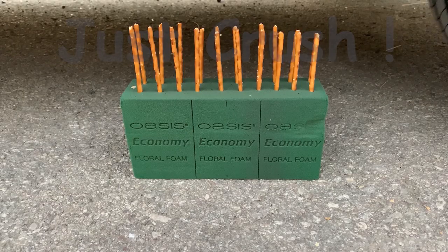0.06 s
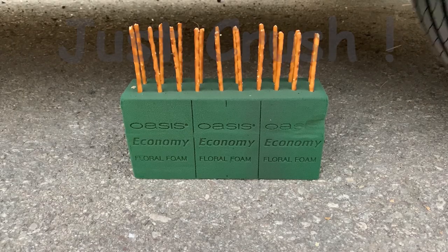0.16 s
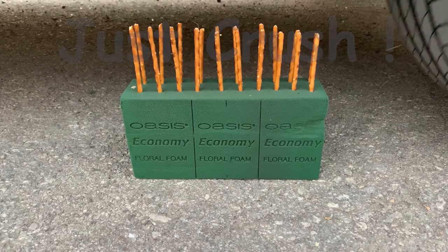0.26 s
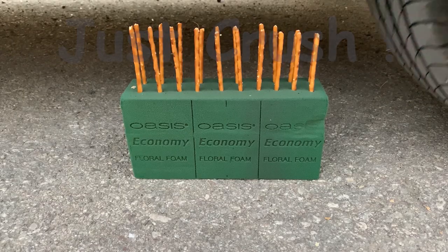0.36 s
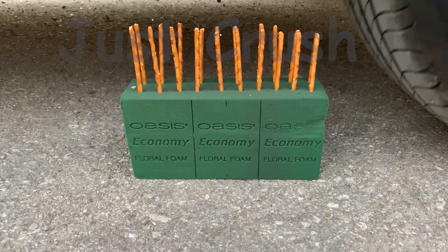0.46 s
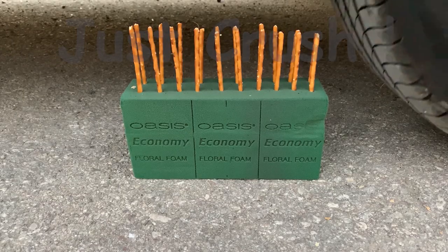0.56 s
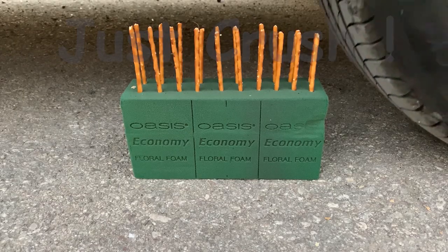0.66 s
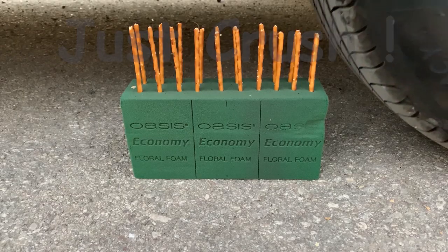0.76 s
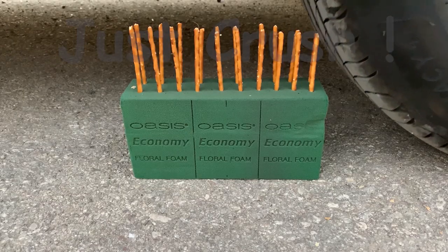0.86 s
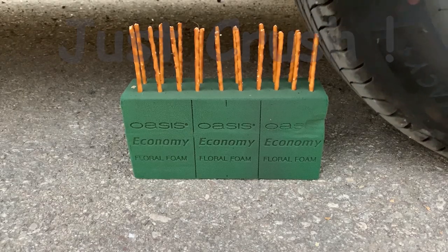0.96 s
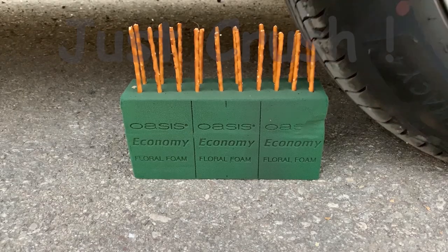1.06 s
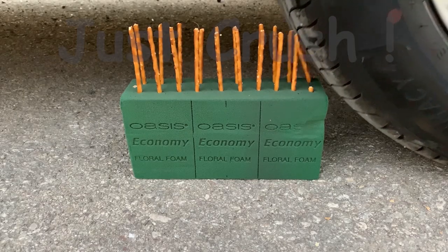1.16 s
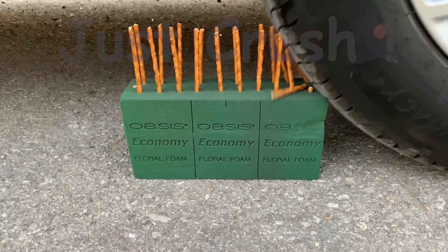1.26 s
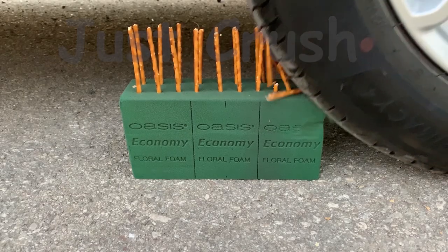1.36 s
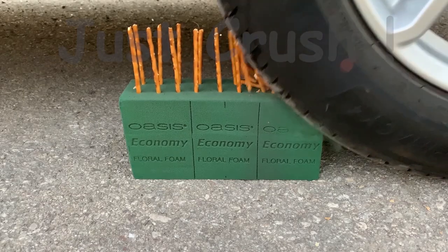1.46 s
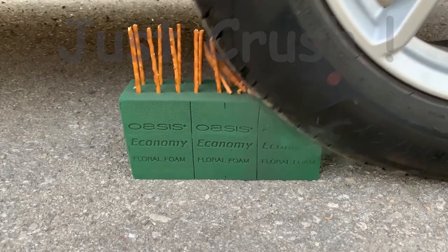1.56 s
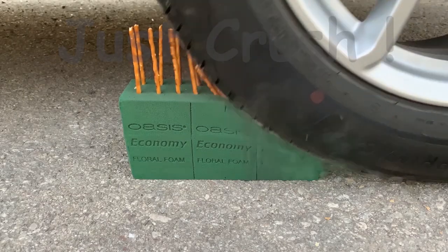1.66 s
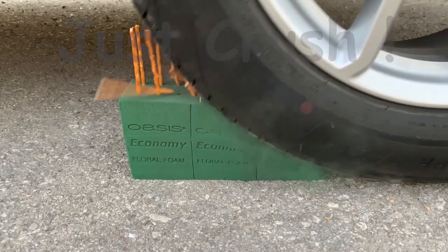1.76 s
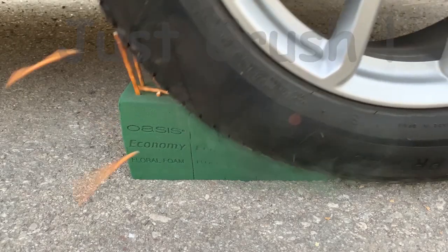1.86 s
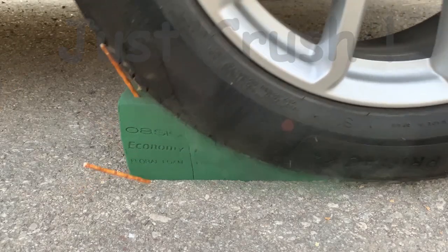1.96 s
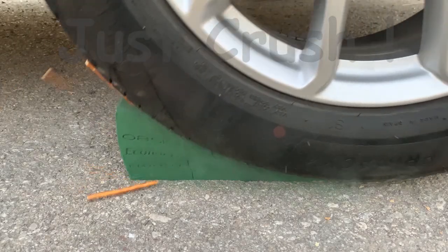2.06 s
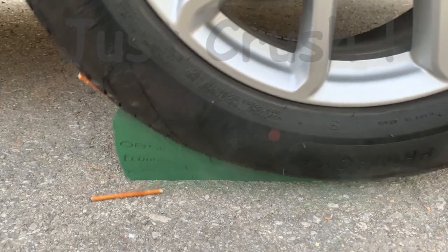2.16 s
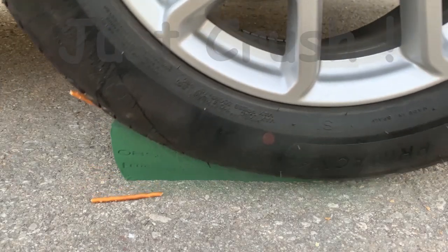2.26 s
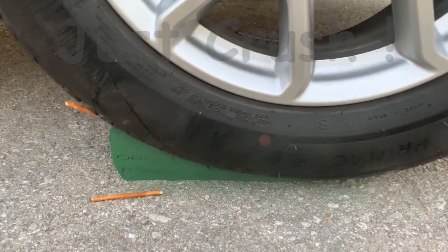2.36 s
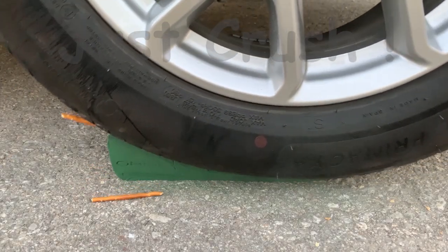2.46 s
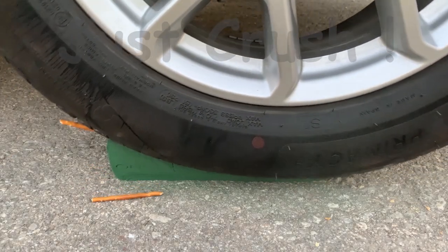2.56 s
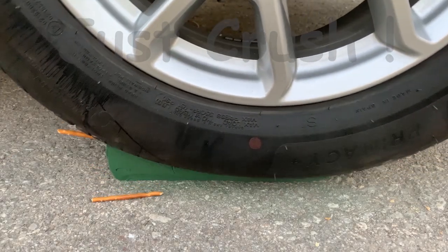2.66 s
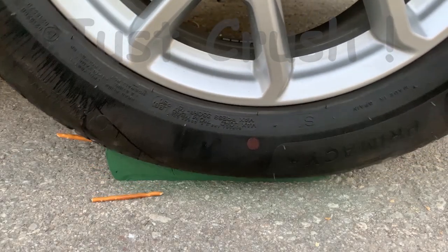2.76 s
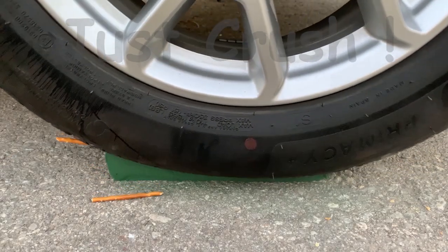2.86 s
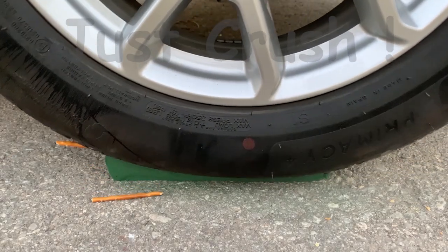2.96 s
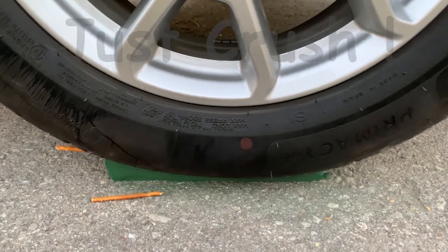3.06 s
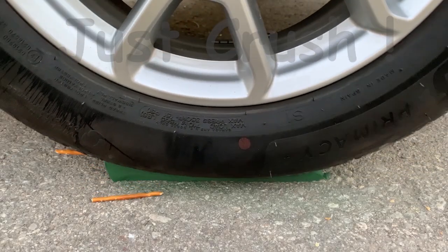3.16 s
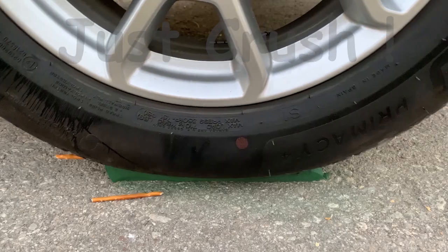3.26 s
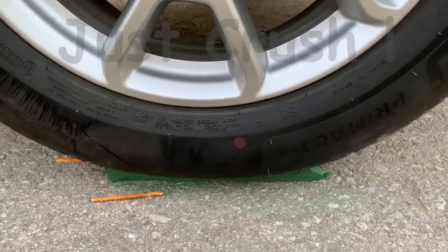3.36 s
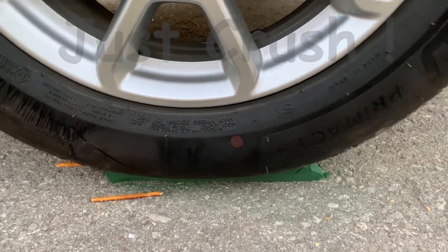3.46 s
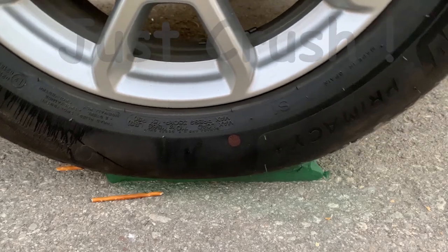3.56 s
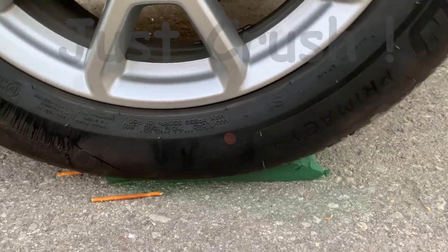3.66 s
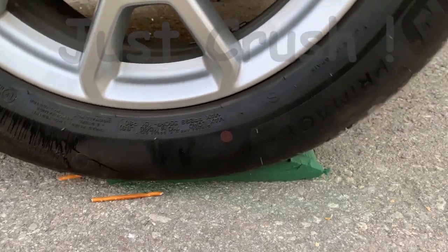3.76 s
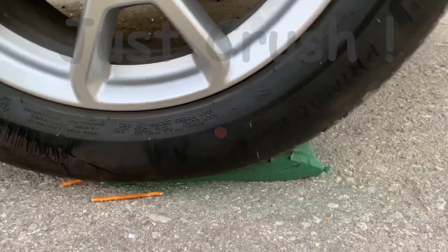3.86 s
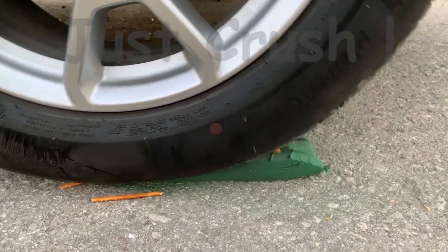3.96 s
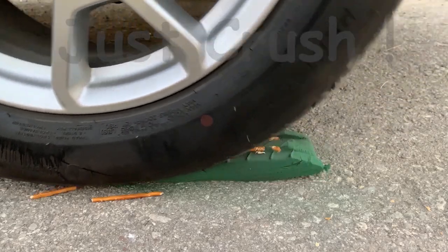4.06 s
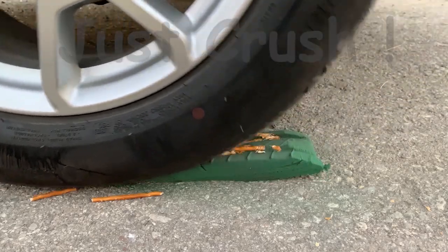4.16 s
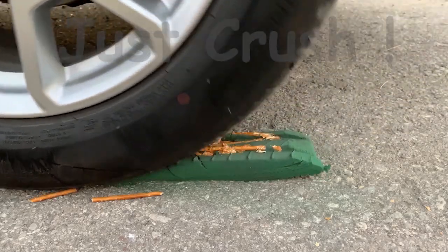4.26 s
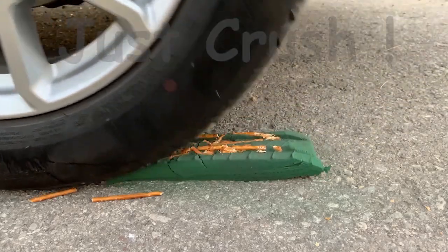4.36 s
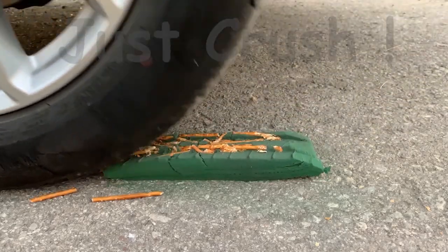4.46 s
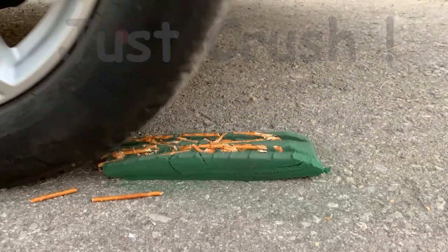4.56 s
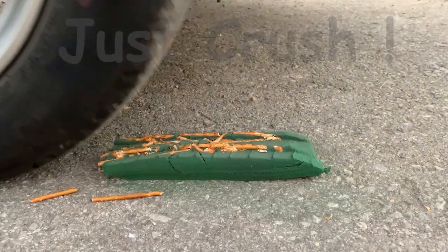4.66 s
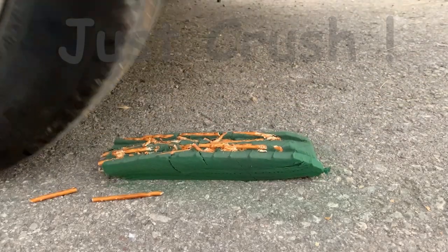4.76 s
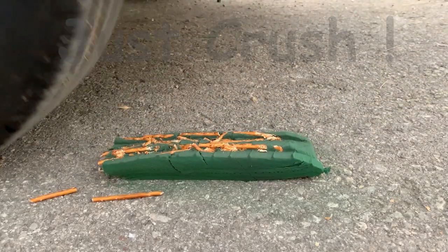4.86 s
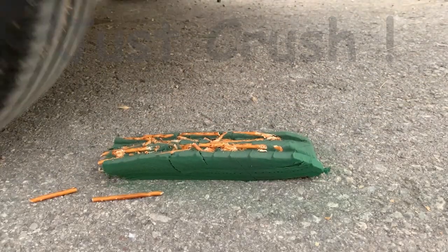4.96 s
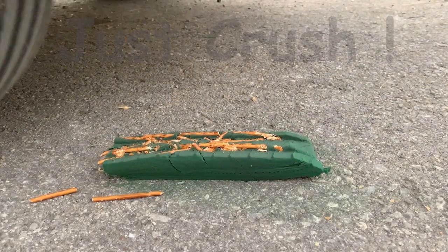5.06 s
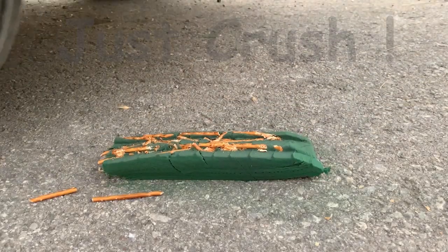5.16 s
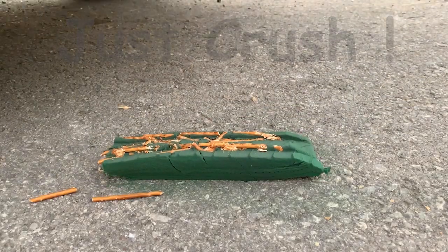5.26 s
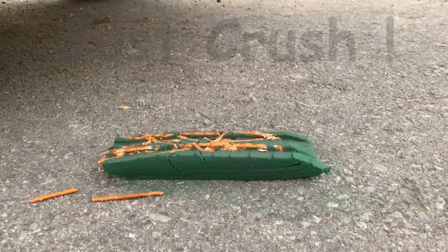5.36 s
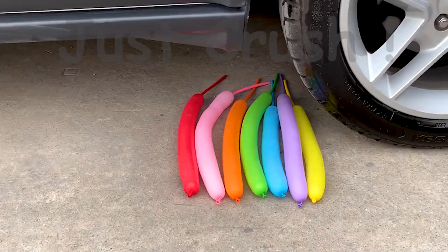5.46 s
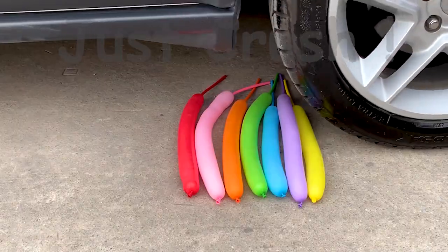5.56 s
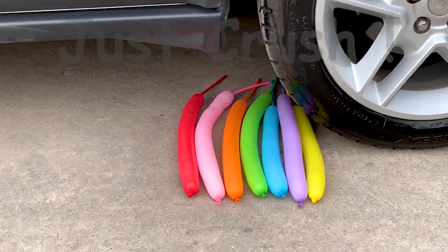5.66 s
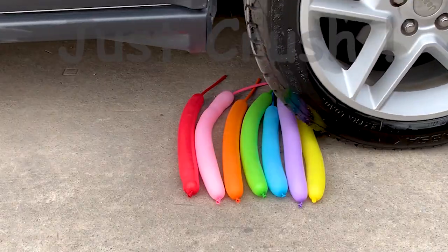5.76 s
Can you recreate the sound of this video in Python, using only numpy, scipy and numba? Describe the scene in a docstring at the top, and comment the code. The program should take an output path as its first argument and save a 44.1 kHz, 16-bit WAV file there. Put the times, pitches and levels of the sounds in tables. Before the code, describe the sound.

A car engine idles with a quiet, low hum, heard from close by on the asphalt. At about 1.1 seconds the tyre meets brittle sticks standing in a dry foam block, and the first sharp snaps come with soft thumps. From 1.4 to 2.1 seconds the crush is loudest: a dense crunch of bursting foam packed with cracking sticks. It then grows thinner and higher, turning into a fine fizz with scattered snaps, including strong cracks near 2.5 and 3.3 seconds. By 4 seconds it has faded to a few small ticks. Around 4.4 seconds the flattened block peels off the tread with a brief, soft, lower rasp. The idle carries on, with a faint click near 5.1 seconds. At about 5.5 seconds the background changes abruptly to a low rumble, drone and faint hiss, lasting to the end.

```python
"""A low engine idle, then loud snapping and crunching: a car creeps over a dry foam block stuck with
brittle sticks, close to a phone on the asphalt. Sticks and foam walls snap over a dense crackle of
bursting cells. The crackle's sharp low edge climbs, so the crunch thins to a treble fizz, then drops
back near the end. The flattened block peels off the tread, and at the very end the scene cuts to
another spot with rumble, drone and hiss."""
import sys
import numpy as np
from scipy import signal
from scipy.fft import rfft, irfft
from scipy.io import wavfile
from scipy.ndimage import uniform_filter1d
from numba import njit

SR = 44100
rng = np.random.default_rng(int(sys.argv[2]) if len(sys.argv) > 2 else 0)


def inscribe(sig):
    """Save sig as 16-bit PCM at rate SR to the path in sys.argv[1].

    A 1-D sig is mono; a 2-D sig holds one channel per row.
    Samples are clipped to [-1, 1] before scaling.
    """
    pcm = np.round(np.clip(np.atleast_2d(sig).T, -1, 1) * 32767)
    wavfile.write(sys.argv[1], SR, pcm.astype(np.int16))


N = 255865
CUT_S = 5.46  # cut to the second spot

# Swell and decay of the crush: time_s, crackle_db, fizz_db
CRUSH_LEVELS = [(1.06, -39, -54), (1.12, -45, -74), (1.16, -35.5, -72), (1.22, -42, -70),
                (1.25, -37.5, -59), (1.32, -39.5, -54), (1.379, -24, -46), (1.5, -23.5, -42.5),
                (1.68, -21.5, -37), (1.92, -21.5, -39), (2.04, -26, -40.5), (2.08, -30.5, -40),
                (2.18, -35, -41.5), (2.28, -31, -44.5), (2.38, -32, -46), (2.46, -32, -45),
                (2.67, -34, -48), (2.69, -41.5, -48), (2.703, -31.5, -48), (2.8, -39, -51),
                (2.95, -45.5, -54.5), (3.22, -47.5, -56), (3.4, -43, -52), (3.66, -55.5, -53.5),
                (3.86, -65, -54.5), (3.96, -82, -60.5), (4.23, -55, -64.5), (4.3, -79, -78),
                (4.42, -82, -68)]
# The crackle's sharp low edge climbs, then drops back near the end: time_s, edge_hz
CRACKLE_EDGE = [(1.1, 437), (1.55, 470), (1.7, 410), (1.78, 340), (1.98, 343), (2.2, 640), (2.4, 820),
                (2.76, 1060), (2.83, 2500), (3.38, 2450), (3.65, 4000), (3.9, 4660), (3.97, 494.4)]
# Moments when the block gives way: start_s, thump_db, pitch_hz, t60_s, debris_db
COLLAPSES = [(1.096, -39, 323.4, 0.61, -47), (1.18, -16.5, 300, 0.029, -59.5),
             (1.229, -25, 229, 0.036, -29.5), (1.449, -33.5, 186, 0.17, -26.5),
             (1.621, -31.5, 233, 0.3, -35), (1.783, -10, 279, 0.075, -43), (1.841, -23, 301, 0.17, -36),
             (1.911, -14, 316, 0.071, -48.5), (2.489, -44.5, 380, 0.19, -41.5),
             (3.315, -35, 145.5, 0.12, -30), (3.315, -35, 279, 0.12, -60), (3.314, -24, 504, 0.084, -32.5)]


def undb(db):
    """Decibels to gain."""
    return 10 ** (np.asarray(db) / 20)


def unit(x):
    """Scale to rms 1."""
    return x / np.sqrt(np.mean(x ** 2))


def unit_peak(x):
    """Scale to peak 1."""
    return x / np.max(np.abs(x))


def curves(table):
    """Automation curves: each column after time_s, joined by straight lines."""
    times, *columns = np.transpose(table)
    return [np.interp(np.arange(N) / SR, times, column) for column in columns]


def during(start_s, end_s, fade_s=0.034):
    """A gate with short fades."""
    t = np.arange(N) / SR
    return np.clip((t - start_s) / fade_s, 0, 1) * np.clip((end_s - t) / fade_s, 0, 1)


def colour(x, tone):
    """Causal EQ through (freq_hz, gain_db) points, built from the folded cepstrum."""
    hz, db = np.transpose(tone)
    log_gain = np.interp(np.log(np.arange(1, 4098) * SR / 8192), np.log(hz), db) * np.log(10) / 20
    cepstrum = irfft(log_gain)
    cepstrum[1:4096] *= 2
    cepstrum[4097:] = 0
    impulse = irfft(np.exp(rfft(cepstrum)))[:4096]
    return signal.fftconvolve(x, impulse)[:len(x)]


@njit
def svf(x, hz, damping, high):
    """Sweepable state-variable filter: high-pass if high, else band-pass."""
    y, band_state, low_state = np.empty(len(x)), 0., 0.
    for i in range(len(x)):
        g = np.tan(np.pi * hz[i] / SR)
        mid = (band_state + g * (x[i] - low_state)) / (1 + g * (g + damping))
        low = low_state + g * mid
        band_state, low_state = 2 * mid - band_state, 2 * low - low_state
        y[i] = x[i] - damping * mid - low if high else damping * mid
    return y


def steep_highpass(x, hz):
    """Tenth-order Butterworth high-pass with a moving edge."""
    for stage in range(5):
        x = svf(x, hz, 2 * np.sin((2 * stage + 1) * np.pi / 20), high=True)
    return x


def band(x, low_hz, high_hz):
    """Static band-pass."""
    return signal.sosfilt(signal.butter(2, [low_hz, high_hz], "bandpass", fs=SR, output="sos"), x)


def rings(x, modes):
    """Resonator bank of (pitch_hz, width_hz, gain_db) modes, scaled to rms 1."""
    return unit(sum(undb(db) * svf(x, np.full(N, float(hz)), width / hz, high=False)
                    for hz, width, db in modes))


def bursts(per_s, spread_db, smear_s, hiss):
    """Random puffs of noise, mostly small and a few large, over a steady hiss."""
    hits = (rng.random(N) < per_s / SR) * undb(spread_db * np.minimum(rng.exponential(size=N), 4))
    power = signal.lfilter([1], [1, -np.exp(-1 / (smear_s * SR))], hits ** 2)
    return unit(np.sqrt(power / np.mean(power) + hiss) * rng.standard_normal(N))


def second_spot():
    """Closing ambience: a rumble and a drone that drifts up in pitch, over a wide, faint hiss."""
    # Movement of the low end: time_s, rumble_db, drone_db, drone_hz
    low_end = [(5.46, -46, -47.5, 131.5), (5.526, -45.5, -50, 130), (5.626, -42, -55, 133),
               (5.686, -43, -46, 146), (5.722, -44, -50, 145), (5.762, -58, -50, 150), (5.8, -49, -49, 139)]
    # EQ of the hiss: freq_hz, gain_db
    hiss_tone = [(180, -13.5), (300, -13.5), (968, -25), (1800, -30), (10400, -42.5), (16400, -39)]
    rumble_db, drone_db, drone_hz = curves(low_end)
    rumble = unit(band(rng.standard_normal(N), 40, 108))
    drone = unit(svf(rng.standard_normal(N), drone_hz, damping=0.09, high=False))
    mid, side = (unit(colour(rng.standard_normal(N), hiss_tone)) for _ in range(2))
    hiss = undb(-51) * (mid + 0.5 * side * np.array([[1], [-1]]))
    return (undb(rumble_db) * rumble + undb(drone_db) * drone + hiss) * during(CUT_S - 0.015, 10)


def engine_bay(firing_phase):
    """Bay noise: valve gear chatters for part of each firing, and a tappet ticks once in four."""
    # Bay noise level and the lift of its treble puffs: time_s, level_db, treble_db
    bay_levels = [(0, -47, 8), (.6, -50, 7), (1.2, -46, 5.5), (3, -48.5, 8.5), (4, -50.5, 8), (4.6, -53, 8),
                  (5.46, -56, 7)]
    # EQ of the bay noise: freq_hz, gain_db
    bay_tone = [(30, -45.5), (41, -22), (56, 3), (75, -5), (124, -8.5), (231, -11), (305, -11), (354, -4.5),
                (479, -10.5), (630, -11), (697, -8), (852, -14.5), (1760, -25), (3140, -38), (6020, -45),
                (16000, -80)]
    # Resonances of panels and valve gear: pitch_hz, width_hz, gain_db
    bay_modes = [(690, 25, 7), (1870, 360, -2.5), (3460, 83, -10), (4360, 170, -22)]
    level_db, treble_db = curves(bay_levels)
    puff = unit(1 + np.cos(firing_phase / 2 + 0.77) ** 4)
    bed = unit(colour(rng.standard_normal(N), bay_tone))
    chatter = (undb(treble_db) * puff ** 0.88 - 1) * band(bed, 1210, 9500)
    panels = puff ** 2 * rings(rng.standard_normal(N), bay_modes)
    every_fourth = np.cos(firing_phase / 8 - 2.76) ** 6
    tappet = puff ** 2 * every_fourth * rings(rng.standard_normal(N), [(3450, 220, 0)])
    return undb(level_db) * (bed + chatter + undb(-17.5) * panels + undb(-20) * tappet)


def engine():
    """The idle hums at multiples of its firing rate, with bay noise and a faint, steady hiss."""
    # Idle speed and its lowest three harmonics: time_s, firing_hz, first_db, second_db, third_db
    idle = [(0.0, 30.8, -67, -80, -66), (0.09, 30.23, -62, -71, -57), (0.32, 29.62, -80, -78, -52),
            (0.78, 27.47, -59, -76, -64), (1.12, 29.9, -67, -67, -49), (1.28, 31.2, -72, -77, -62),
            (1.38, 31.15, -55.5, -69.5, -79.5), (1.57, 30.03, -52.5, -62.5, -63),
            (1.82, 29.4, -61, -70, -45), (1.87, 28.3, -73.5, -69, -50.5), (2.11, 29.15, -59, -60, -56.5),
            (3.47, 29.55, -53.5, -55, -50.5), (5.41, 29.4, -46, -52.5, -47), (5.46, 31.35, -33, -34, -44)]
    # Steady harmonics, played from the fourth up: multiple, relative_db
    harmonics = [(1, 0), (2, -6), (3, -1), (4, -24), (5, -8), (6, -36), (7, -45.5), (8, -5.5), (9, -47.5),
                 (10, -64), (11, -19.5), (12, -8), (13, -43), (14, -12.5), (15, -47), (16, -6.5), (17, -41),
                 (18, -9), (19, -29.5), (20, -23.5), (21, -26), (22, -64.5), (23, -28), (24, -7.5),
                 (25, -46.5), (26, -45.5)]
    firing_hz, *hum_dbs = curves(idle)
    phase = 2 * np.pi * np.cumsum(firing_hz) / SR
    hum = sum(np.sqrt(2) * undb(db) * np.cos((k + 1) * phase + k * 2.98) for k, db in enumerate(hum_dbs))
    buzz = sum(undb(db - 58.5) * np.cos(k * phase + k * k) for k, db in harmonics if k > 3)
    bay = engine_bay(phase)
    air = undb(-81) * unit(band(rng.standard_normal(N), 2500, 6955))
    return (hum + buzz + bay + air) * during(-1, CUT_S + 0.0047)


def peel():
    """The flattened block peels off the tread: dense little slips ring it and hiss above it."""
    # Envelope of the peel: time_s, ring_db, hiss_db
    peel_levels = [(4.401, -83, -54), (4.425, -44, -49.5), (4.502, -50.5, -69), (4.507, -40.5, -55),
                   (4.59, -66, -59), (4.62, -66, -73.5), (4.63, -77, -89)]
    # Resonances of the crushed block: pitch_hz, width_hz, gain_db
    block_modes = [(521, 61, 9.5), (835, 150, 4), (1284, 83, 2), (2620, 280, 2)]
    ring_db, hiss_db = curves(peel_levels)
    slips = bursts(per_s=447.4, spread_db=3.4, smear_s=0.00036, hiss=0.14)
    ring = undb(ring_db) * rings(slips, block_modes)
    hiss = undb(hiss_db) * unit(band(slips, 2100, 8500))
    return (ring + hiss) * during(peel_levels[0][0], peel_levels[-1][0])


def thumps(attack_s=0.0027):
    """Each collapse softly pushes a low mode of the block."""
    out, t = 0, np.arange(N) / SR
    for start_s, db, hz, t60_s, _ in COLLAPSES:
        age = np.maximum(t - start_s, 0)
        envelope = np.exp(-np.log(1000) * age / t60_s) * (1 - np.exp(-age / attack_s))
        out = out + undb(db) * envelope * np.sin(2 * np.pi * hz * age)
    return out


def debris(grit, t60_s=0.15, edge_hz=420.):
    """A short shower of grit follows each collapse."""
    t = np.arange(N) / SR
    showers = sum((t > start_s) * undb(db - 60 * np.maximum(t - start_s, 0) / t60_s)
                  for start_s, *_, db in COLLAPSES)
    shifted = np.roll(grit, N // 2)  # so its grains do not double the crackle's
    return showers * unit(steep_highpass(shifted, np.full(N, edge_hz)))


def chips(knocks_per_s, ring_at_1khz_s, count=24):
    """Loose chips of foam and stick, each with its own pitch, ring briefly when knocked."""
    out = 0
    for hz in np.geomspace(450, 5600, count):
        knocks = (rng.random(N) < knocks_per_s / SR) * rng.standard_normal(N)
        decay = (hz / 1000) ** 0.5 / (ring_at_1khz_s * SR)  # small chips die sooner
        pole = np.exp(2j * np.pi * hz / SR - decay)
        out = out + unit(signal.lfilter([1], [1, -pole], knocks).imag) * hz ** 0.5
    return unit(out)


def fizz(crackle_edge_hz):
    """The finest cells burst as a treble fizz, whose edge follows the crackle's upwards."""
    # EQ of the fizz: freq_hz, gain_db
    fizz_tone = [(3650, -79.5), (6200, 1), (8110, 3), (11300, -0.5), (15400, -13), (16100, -34.5),
                 (16400, -34)]
    edge_hz = np.clip(4 * np.maximum.accumulate(crackle_edge_hz), 6000, 7700)
    dense = bursts(per_s=900, spread_db=1.8, smear_s=0.00036, hiss=1)
    sparse = bursts(per_s=81, spread_db=3, smear_s=0.0011, hiss=0.01)
    return unit(steep_highpass(colour(dense + undb(-8.5) * sparse, fizz_tone), edge_hz))


def crackle():
    """Foam cells burst and chips ring above a moving low edge, layered with fizz and debris."""
    # EQ of the bursting cells: freq_hz, gain_db
    cell_tone = [(240, -42), (400, -13.5), (698, -1), (1110, -4.5), (1430, -2.5), (1670, -4), (2100, -4.5),
                 (3460, -13.5), (4730, -15.5), (6400, -24.5), (8320, -56.5), (14100, -120)]
    # Treble shelf, dull at first while only the sticks give way: time_s, gain_db
    brightness = [(1.1, -10), (1.27, 0), (1.7, 1), (2.1, 6.5), (2.5, 4.5)]
    crackle_db, fizz_db = curves(CRUSH_LEVELS)
    edge_hz, = curves(CRACKLE_EDGE)
    shelf_db, = curves(brightness)
    cells = bursts(per_s=1200, spread_db=5.1, smear_s=0.00037, hiss=0.22)
    grit = colour(cells + undb(-9) * chips(knocks_per_s=110, ring_at_1khz_s=0.003), cell_tone)
    crunch = steep_highpass(grit, edge_hz)
    crunch += (undb(shelf_db) - 1) * svf(crunch, np.full(N, 2600.), damping=0.85, high=True)
    # The whole block has a woody ring, lost as it crumbles.
    woody_db = -1 - 25.5 * (np.arange(N) / SR - brightness[0][0])
    crunch += undb(woody_db) * rings(grit, [(614, 130, 0)]) * np.std(grit)
    crunch /= np.sqrt(uniform_filter1d(crunch ** 2, SR // 8))  # even level wherever the edge sits
    crush = undb(crackle_db) * crunch + undb(fizz_db) * fizz(edge_hz)
    return crush * during(CRUSH_LEVELS[0][0], CRUSH_LEVELS[-1][0]) + debris(grit)


def small_snaps(count=200, from_s=1.14, to_s=3.8):
    """Cues for small snaps at random times: level rides on the crackle, pitch lies above its edge."""
    when, size, pitch, looseness = rng.random((count, 4)).T
    start_s = from_s + (to_s - from_s) * when
    onset = (start_s * SR).astype(int)
    edge_hz = curves(CRACKLE_EDGE)[0][onset]
    crackle_db = curves(CRUSH_LEVELS)[0][onset]
    climb_octaves = np.log2(edge_hz / CRACKLE_EDGE[0][1])
    level_db = crackle_db + 1 + 3.5 * climb_octaves + 6.5 * (2 * size - 1)
    pitch_hz = np.clip(edge_hz * 2 ** (0.98 * pitch), 700, 5400)
    rattle_db = -25 + 10 * (2 * looseness - 1)
    tick_db = -20.5 + 7.5 * climb_octaves
    return list(zip(start_s, level_db, pitch_hz, rattle_db, tick_db))


def snap(pitch_hz, rattle_db, tick_db, edge_hz):
    """One fracture: a brief pitched crack, debris rattle, thud in the block, click, tick, gritty tail."""
    t = np.arange(SR // 8) / SR

    def noise_hit(low_hz, high_hz, decay_s):
        return unit_peak(band(rng.standard_normal(len(t)) * np.exp(-t / decay_s), low_hz, high_hz))

    cycles = pitch_hz * t
    crack = unit_peak(np.sin(2 * np.pi * cycles) * cycles * np.exp(-cycles / 0.75))
    rattle = noise_hit(0.5 * pitch_hz, min(1.41 * pitch_hz, 6200), decay_s=0.0078)
    thud = noise_hit(450, 900, decay_s=0.007)
    click = noise_hit(1200, 4000, decay_s=0.0003)
    tick = noise_hit(6400, 9800, decay_s=0.00027)
    tail = noise_hit(550, 6000, decay_s=0.019)
    # A short ping sits just above the crackle's edge.
    ping = np.sin(2 * np.pi * max(1.25 * edge_hz, 600) * t) * np.exp(-t / 0.0025)
    body = crack + undb(rattle_db) * rattle + undb(-37) * tail + undb(-13) * ping + undb(-10.5) * click
    # As the edge climbs, the body loses its lows and the thud fades.
    low_cut_hz = min(0.92 * edge_hz, 0.8 * pitch_hz)
    body = signal.sosfilt(signal.butter(4, low_cut_hz, "highpass", fs=SR, output="sos"), body)
    thud_db = -15.5 - 11.5 * np.log2(edge_hz / CRACKLE_EDGE[0][1])
    return body + undb(thud_db) * thud + undb(tick_db) * tick


def snaps():
    """Sticks and foam walls break under the tyre: featured snaps among a scatter of small ones."""
    # Featured snaps: start_s, level_db, pitch_hz, rattle_db, tick_db (last two relative to the crack)
    featured_snaps = [(1.0906, -13.5, 1640, -1, -23), (1.096, -17, 1930, -29, -36),
                      (1.103, -25, 1270, 3.5, -30), (1.1779, -13, 2230, -14, -18.5),
                      (1.1803, -15.5, 1800, -18, -32), (1.2313, -12.5, 3330, -21, -39),
                      (1.2341, -16, 1310, -4, -39), (1.2782, -14.5, 1700, -0.5, -26),
                      (1.3465, -17, 700, -3, -19), (1.3649, -8.5, 1730, -3.5, -28),
                      (1.3712, -9, 690, -30, -26), (1.4089, -14.5, 920, -1, -31),
                      (1.4091, -8, 2200, -20, -25), (1.4361, -0.5, 1950, -20, -36),
                      (1.4545, -2, 1400, -5, -34), (1.4992, -15, 1070, 3, -22), (1.5272, -20, 800, -8, -21),
                      (1.572, -18, 1870, 13, -21), (1.5804, -2.5, 2100, -31, -28),
                      (1.6054, -6, 2030, -8, -21), (1.6392, -5, 1560, -0.5, -23),
                      (1.6687, -18, 1495, 7, -34), (1.6767, -8, 1425, -4, -23), (1.684, -8, 1610, -25, -25),
                      (1.695, -7.5, 1440, -2, -27), (1.7025, -7, 2330, -2, -27),
                      (1.7068, -9.5, 1490, -12, -9), (1.716, -7.5, 2070, -6, -25),
                      (1.7504, -17, 915, -3, -26), (1.7719, -10, 1440, 3.5, -26),
                      (1.7836, -4, 1727, -5, -12), (1.8303, -13, 1660, -25, -18),
                      (1.8415, -9.5, 714, -6, -22), (1.8502, -7.5, 2170, -20, -24),
                      (1.8693, -9, 700, -4, -28), (1.8945, -7, 3080, -22, -27),
                      (1.8982, -20.5, 726, -8, -12), (1.9034, -6.5, 1956, -9, -21),
                      (1.9128, -4.5, 885, -27, -22), (1.93, -7, 1650, -25, -29),
                      (1.98, -10, 2890, -11, -24), (1.994, -7, 2130, -1, -25), (2.015, -6, 2430, -9, -28),
                      (2.0282, -6, 880, -7, -19), (2.0459, -13, 730, -2, -25),
                      (2.0585, -8.5, 2420, -29, -33), (2.0917, -3.5, 3016, -7.5, -7),
                      (2.0928, -13, 1096, -8, -20), (2.1471, -14.5, 4620, -10, -5),
                      (2.2239, -18, 790, -27, -20), (2.239, -10.5, 2904, -22, -24),
                      (2.2484, -8.5, 2800, -16, -22), (2.256, -8.5, 2616, -5, -13),
                      (2.266, -11, 2760, -16, -23), (2.282, -7, 1490, -4.5, -21),
                      (2.3321, -14.5, 1885, -24, -22), (2.344, -18, 1700, -4, -24),
                      (2.395, -15, 2777, -20, -14), (2.4299, -14, 1027, -33, -15),
                      (2.4444, -21, 1088, -4, -22), (2.4678, -11.5, 2794, -29, -4.5),
                      (2.4852, -1.5, 1318, -7, -12.5), (2.508, -16, 1250, -22, -11),
                      (2.5599, -15, 4370, -22, -30), (2.572, -17, 1320, -9, -13),
                      (2.588, -8, 2945, -34, -23), (2.652, -19.5, 1467, -20, -5),
                      (2.666, -18.5, 5400, -15, -17), (2.6984, -5.5, 2650, -5.5, -32),
                      (2.731, -13, 3000, -22, -13), (2.757, -15.5, 3274, -4.5, -19),
                      (2.7595, -16, 5000, -9, -22), (2.811, -30, 2895, 3.5, -19),
                      (2.8797, -21, 5270, -22, -8), (2.9028, -19.5, 2780, -1, -11),
                      (2.925, -23, 4640, -9, 0.5), (2.979, -26, 3605, -20, -6),
                      (3.0098, -19, 2920, -18, -27), (3.0372, -29, 3370, -18, -16),
                      (3.0463, -25.5, 3034, -4, -23), (3.083, -22, 3306, -20, -21),
                      (3.1267, -25.5, 4540, -6, -22), (3.1587, -24, 3045, -22, -22),
                      (3.17, -12, 2923, -10, -6.5), (3.2324, -28, 4410, -21, -7),
                      (3.2703, -30, 3493, -20, 1), (3.282, -10.5, 3830, -16, -8),
                      (3.3127, -2.5, 2700, -11, -9.5), (3.315, -10.5, 1930, -28, -8),
                      (3.3287, -12.5, 4900, -9.5, -15), (3.3294, -18.5, 1910, -18, -25.5),
                      (3.344, -25, 3470, -10, -17.5), (3.3528, -25, 3200, -11.5, -13),
                      (3.392, -23, 3950, -22, -4), (3.4045, -20.5, 3860, -23, -20),
                      (3.442, -24, 3790, -11, -16), (3.462, -21.5, 4520, -22, 0.5),
                      (3.4946, -29, 4036, -11, -15), (3.501, -35.5, 3600, -20, 0),
                      (3.5145, -28, 4105, -15, 1), (3.5294, -32, 4180, -20, -11),
                      (3.5409, -32, 4306, -22, 4), (3.5522, -30, 4510, -21, 6.5),
                      (3.6176, -27.5, 4385, -30, 0), (3.6622, -32, 4920, -15, 7.5),
                      (3.7471, -45.5, 5300, -13, 17), (3.8186, -22.5, 5255, -17, 1),
                      (3.821, -35, 1100, -5, -8), (3.9778, -46, 1116, -12, 14), (4.0417, -39, 2660, -6, 17),
                      (4.198, -28, 2326, -8, -3.5), (4.2092, -38.5, 1138, -23, 1),
                      (4.4219, -33.5, 1060, 0.5, -1), (4.4428, -28.5, 1140, -5, -4),
                      (4.4553, -31.5, 1260, -24, -5), (4.5088, -45, 710, 3, -9),
                      (5.0814, -38, 1170, -7, -15), (5.087, -48, 3500, 3, -20)]
    edge_hz, = curves(CRACKLE_EDGE)
    out = np.zeros(N + SR)
    for start_s, level_db, pitch_hz, rattle_db, tick_db in small_snaps() + featured_snaps:
        onset = int(start_s * SR)
        hit = snap(pitch_hz, rattle_db, tick_db, edge_hz[onset])
        out[onset:onset + len(hit)] += undb(level_db) * hit
    return band(out[:N], 380, 22000)


def scene():
    """Everything sits in the centre, except the wide hiss of the second spot."""
    return crackle() + snaps() + thumps() + peel() + engine() + second_spot()


def record(dry):
    """The phone's port has a dip in the treble; the phone rounds the loudest peaks and cuts the top."""
    dip_hz, dip_width_hz, top_hz = 6573, 1860, 16300
    dipped = dry - 0.44 * band(dry, dip_hz - dip_width_hz / 2, dip_hz + dip_width_hz / 2)
    rounded = 0.38 * np.tanh(dipped / 0.67)
    return signal.sosfilt(signal.ellip(8, 0.2, 70, top_hz, fs=SR, output="sos"), rounded)


dry = scene()
out = record(dry)
inscribe(out)
```